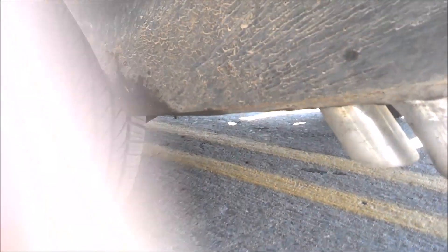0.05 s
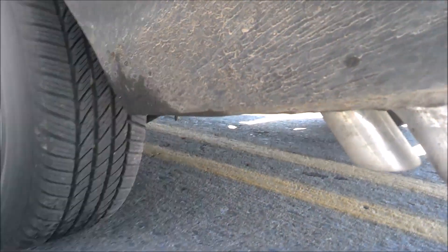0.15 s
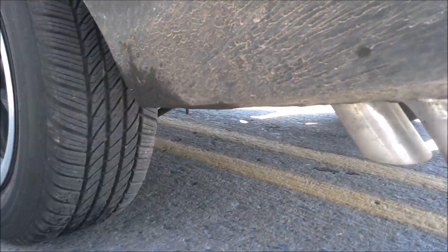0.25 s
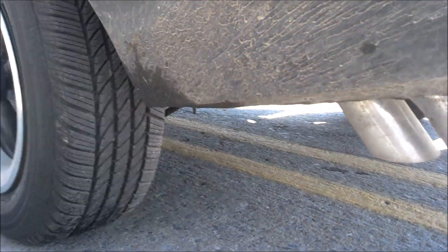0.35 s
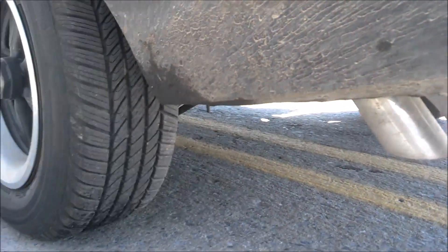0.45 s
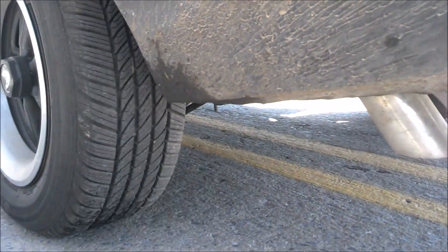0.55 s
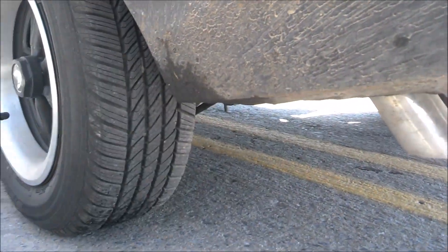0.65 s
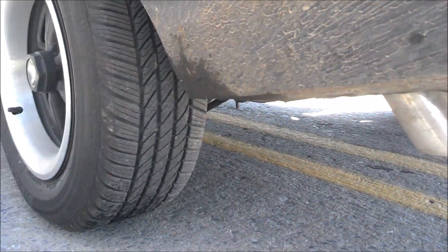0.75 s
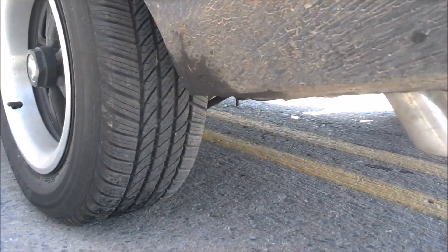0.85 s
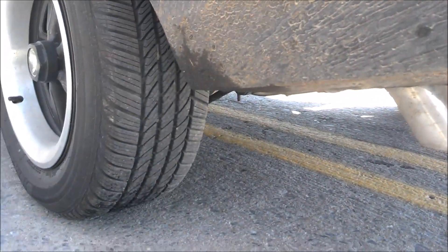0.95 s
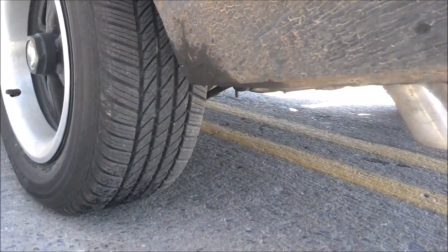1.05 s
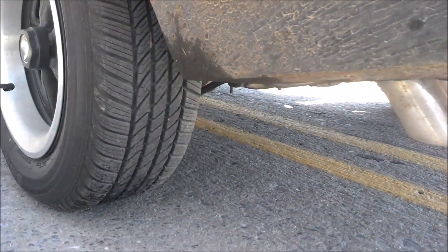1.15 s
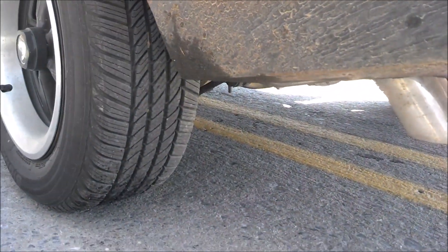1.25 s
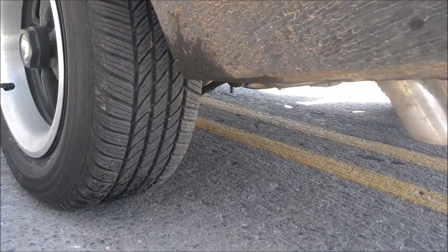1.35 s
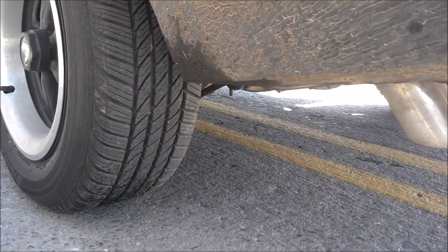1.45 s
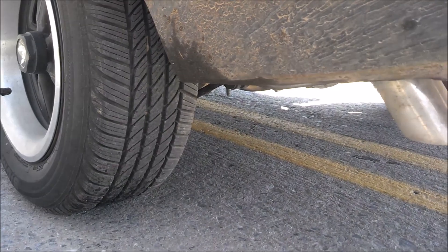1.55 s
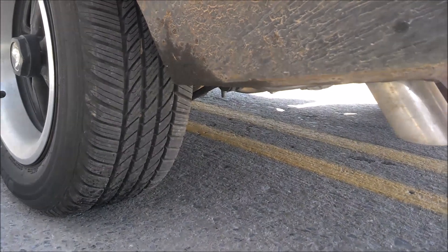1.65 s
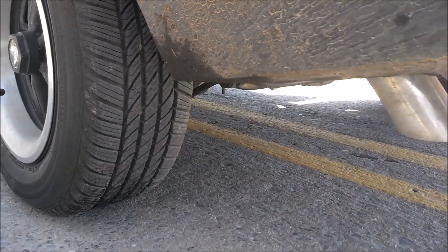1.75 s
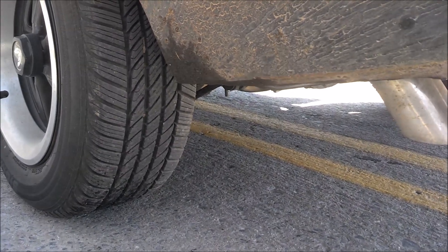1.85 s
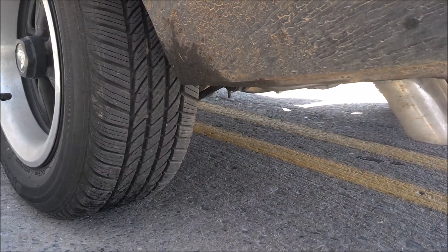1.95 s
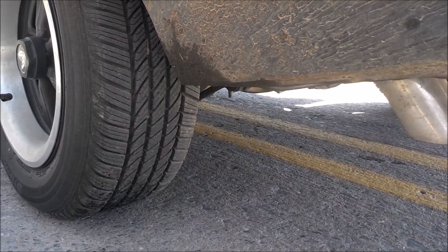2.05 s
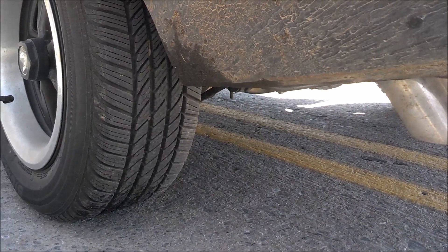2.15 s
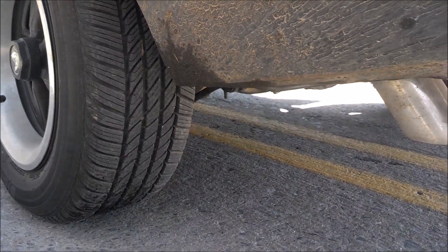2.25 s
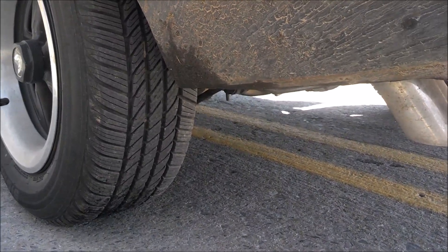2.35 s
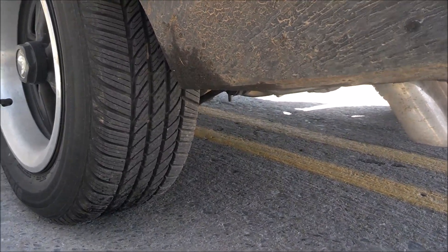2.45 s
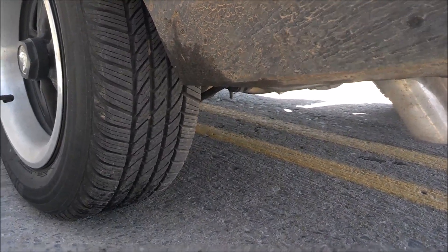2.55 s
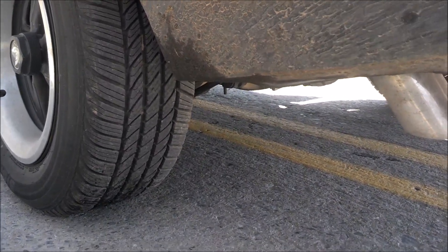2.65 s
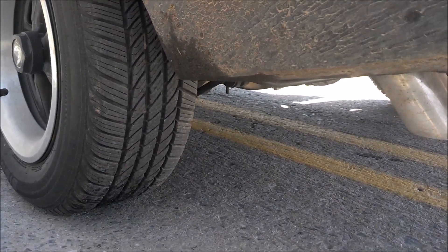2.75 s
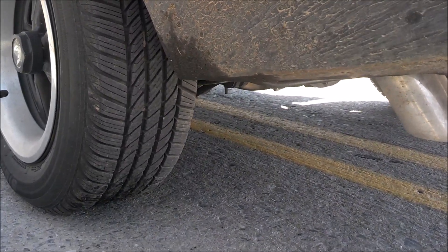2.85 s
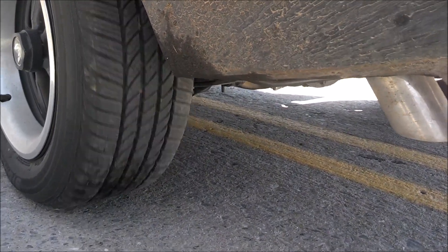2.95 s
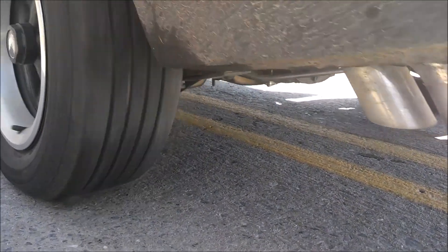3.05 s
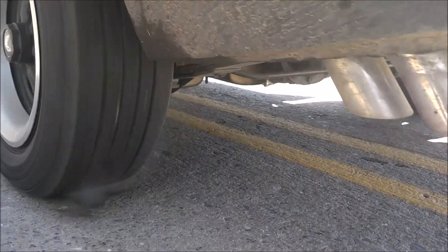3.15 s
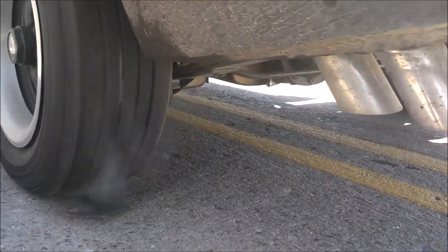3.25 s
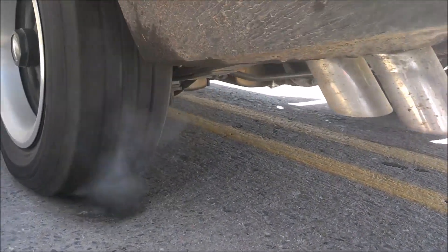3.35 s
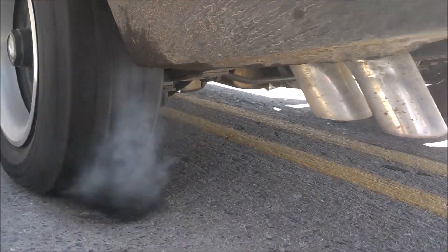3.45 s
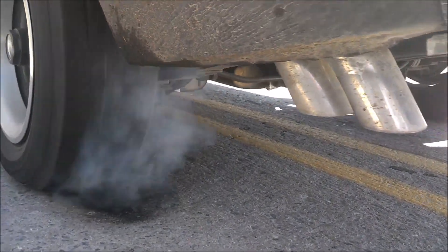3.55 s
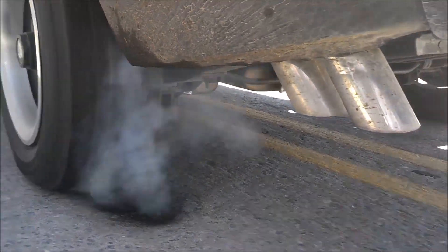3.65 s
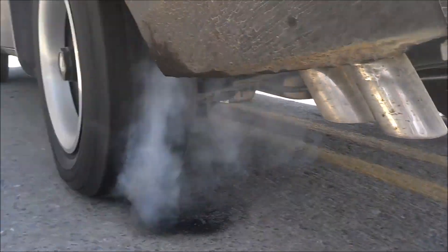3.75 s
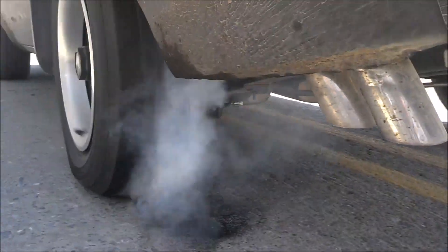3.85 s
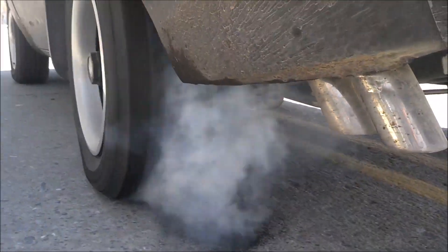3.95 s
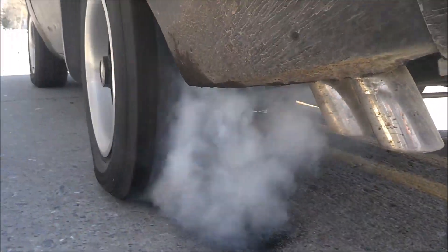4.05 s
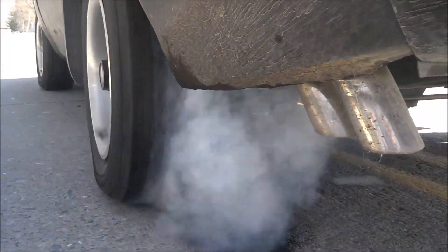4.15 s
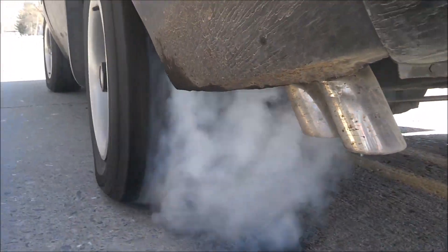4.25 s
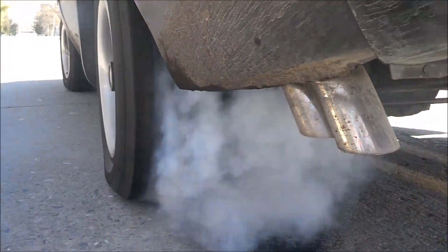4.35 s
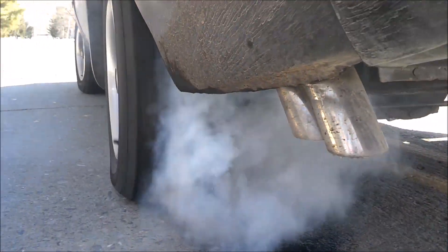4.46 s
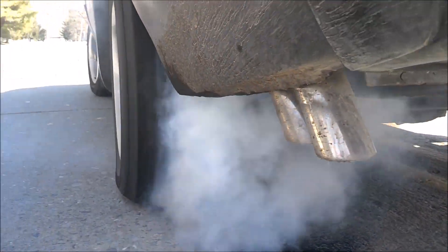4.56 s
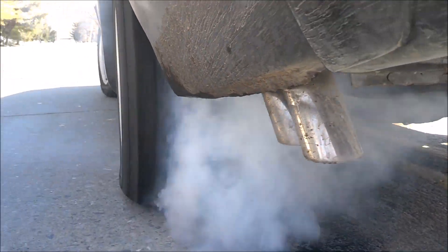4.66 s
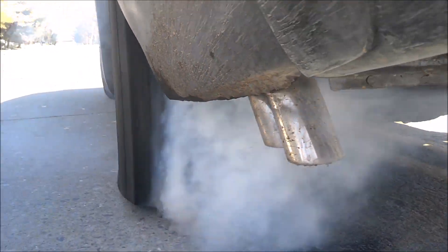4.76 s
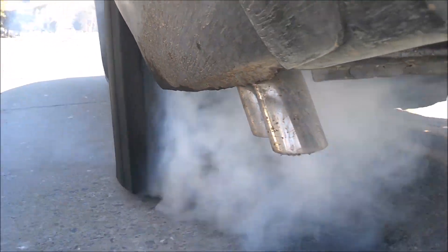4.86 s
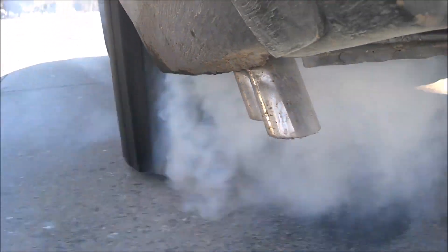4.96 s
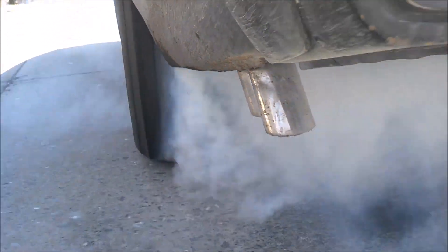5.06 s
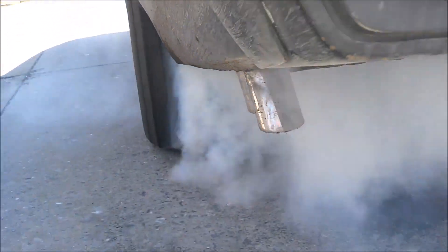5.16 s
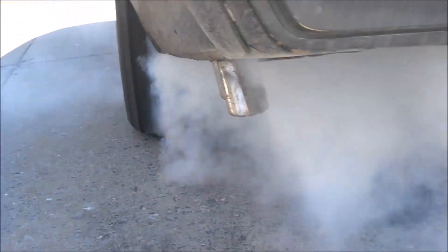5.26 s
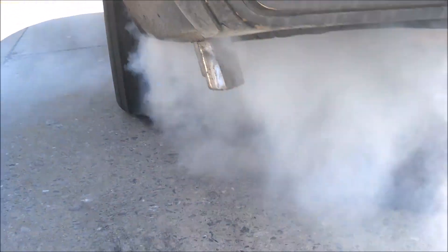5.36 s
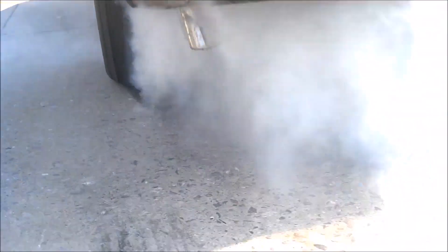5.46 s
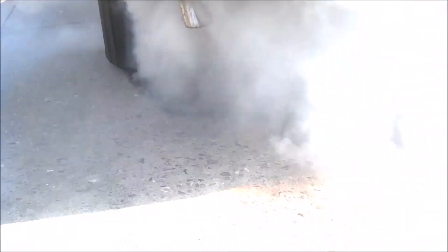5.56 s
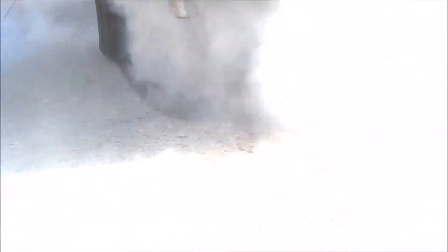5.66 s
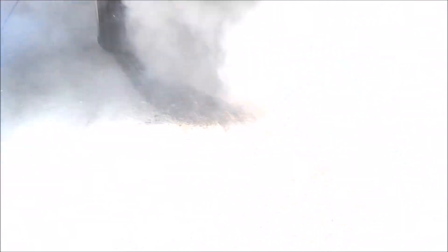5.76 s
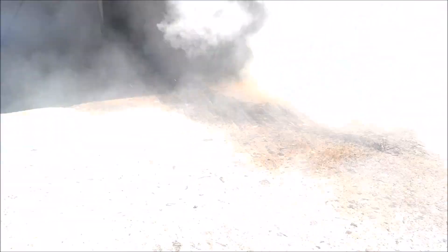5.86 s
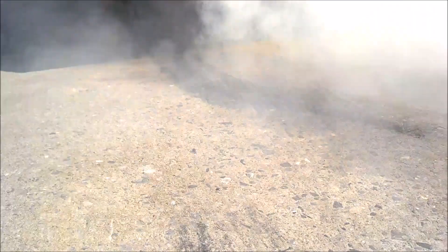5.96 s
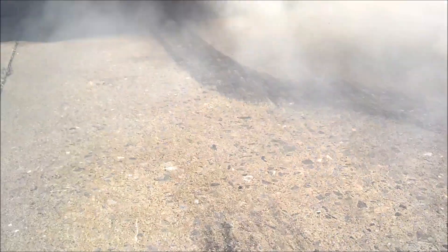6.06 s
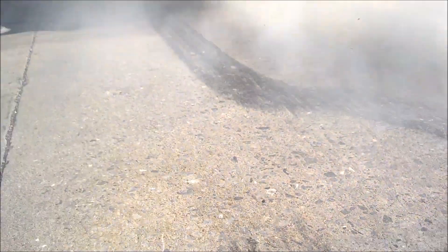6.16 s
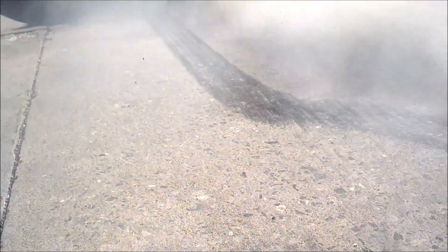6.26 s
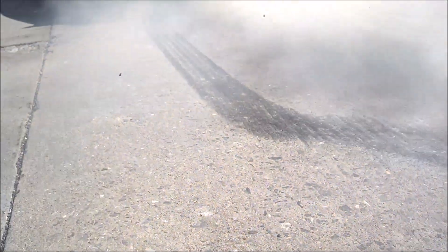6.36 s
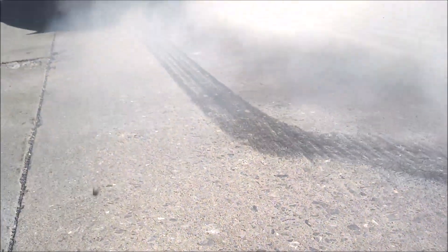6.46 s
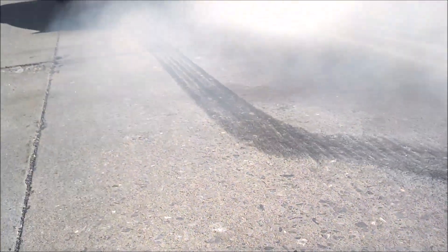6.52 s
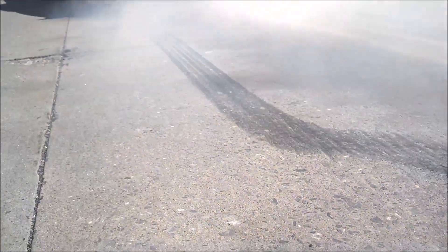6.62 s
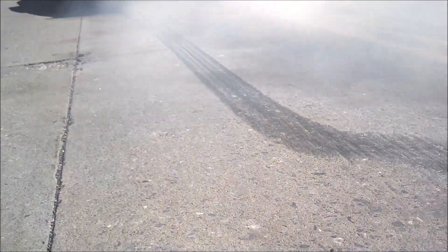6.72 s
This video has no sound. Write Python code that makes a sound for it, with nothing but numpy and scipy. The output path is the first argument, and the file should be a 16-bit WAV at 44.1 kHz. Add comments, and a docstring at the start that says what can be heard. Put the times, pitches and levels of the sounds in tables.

```python
"""A V8 car lopes at idle, then its throttle snaps open in hard single firings and the exhaust note sweeps upwards.
The tyre breaks loose: it squeals cleanly by stick-slip, then hot and ragged with chirps, over a droning exhaust.
The spinning wheel's air buffets two close microphones; at the end the car leaves to the left, heard from behind.
Tones on multiples of the engine cycle and gated noise make the engine; wavering harmonic tones make the tyre.
Delayed subtraction widens the stereo pair, and a limiter lets loud squeals duck the engine."""
import sys
import numpy as np
from scipy import signal
from scipy.fft import rfft, irfft
from scipy.io import wavfile
from scipy.ndimage import uniform_filter1d, minimum_filter1d

SR = 44100
rng = np.random.default_rng(int(sys.argv[2]) if len(sys.argv) > 2 else 0)


def dump(signal):
    """Clip the signal to [-1, 1] and save it as 16-bit WAV at the path in sys.argv[1]."""
    limited = np.clip(np.atleast_2d(signal).T, -1, 1)
    pcm = np.round(limited * 32767).astype(np.int16)
    wavfile.write(sys.argv[1], SR, pcm)


N = 299439
T = np.arange(N) / SR
HZ = np.fft.rfftfreq(N, 1 / SR)

THROTTLE_S = 2.816  # the throttle opens
BITE_S = 2.88  # the first hard firings take over from the idle
SLIP_S = 3.04  # the tyre breaks loose and the load drops
HOT_S = 3.92  # the hot tread stops slipping in step
BEHIND_S = 6.04  # from here the car is heard from behind, where boom and squeal are stronger


def amp(db):
    """Level law: decibels to amplitude gain."""
    return 10 ** (np.asarray(db) / 20)


def unit(x):
    """Power normalisation: scales to rms 1."""
    return x / np.sqrt(np.mean(abs(x) ** 2) + 1e-20)


def ramp(start, seconds):
    """Linear onset: goes from 0 to 1 in a straight line."""
    return np.clip((T - start) / seconds, 0, 1)


def build(start, seconds):
    """Exponential relaxation: grows from 0 towards 1, quickly at first."""
    return 1 - np.exp(-np.maximum(T - start, 0) / seconds)


def curve(rows, axis=1):
    """Linear interpolation: one column of a time table at every sample."""
    rows = np.array(rows)
    return np.interp(T, rows[:, 0], rows[:, axis])


def colour(x, points):
    """Linear filtering: shapes the spectrum by (Hz, dB) points, interpolated over log frequency."""
    hz, db = np.transpose(points)
    gain = amp(np.interp(np.log(HZ + 1), np.log(hz), db))
    return irfft(rfft(x) * gain, N)


def wander(rate):
    """Low-passed noise: a smooth random curve of rms 1 that changes about rate times a second."""
    f = np.fft.rfftfreq(8192, N / SR / 8192)
    slow = irfft(rfft(rng.standard_normal(8192)) / np.sqrt(1 + (f / rate) ** 4))
    return unit(np.interp(T, np.linspace(0, T[-1], len(slow)), slow))


# The car creeps forward, then drives off. Each row: time in seconds, distance in metres.
DISTANCE = [(0, 0.54), (4.6, 0.6), (6.27, 0.83), (6.79, 2.67)]


def away(falloff):
    """Spreading loss: gain as the car leaves; falloff 1 is the inverse of the distance."""
    return (DISTANCE[0][1] / curve(DISTANCE)) ** falloff


def ports(pair, left_db):
    """Sum-and-difference stereo: decodes to left and right, leaning to one side."""
    both, apart = pair
    return np.array([both + apart, both - apart]) * amp(left_db * np.array([[.5], [-.5]]))


# Wind rumble on the microphones. Each row: frequency in Hz, relative level in dB.
BUFFET_COLOUR = [(10, 30), (35, -10), (70, 8), (130, 23), (300, 5), (900, -42)]
# Soft thumps of air. Each row: centre in seconds, length between 1/e points in seconds, level in dB.
THUMPS = [(3.13, 0.08, -40), (3.577, .05, -47), (3.763, 0.06, -34), (5.11, 0.045, -55)]
# Spectrum of a thump. Each row: frequency in Hz, relative level in dB.
THUMP_COLOUR = [(10, 5), (35, -3), (60, -6), (120, -30), (400, -70)]
# air buffets the microphones while the spinning wheel is near
WIND_S, WIND_RISE_S, WIND_END_S, WIND_FALL_S = 3.2, 0.21, 5.6, 0.46


def buffet(common_db=-38, gust_db=4, wind_db=-23, easing_db_per_s=4.0, calm_db=-62):
    """Turbulent pressure: lumpy rumble pushes the microphones in opposite directions; a few thumps hit both."""
    rumble = unit(colour(rng.standard_normal((2, N)), BUFFET_COLOUR))
    wind = amp(wind_db - easing_db_per_s * (T - WIND_S))
    wind = wind * ramp(WIND_S, WIND_RISE_S) * (1 - ramp(WIND_END_S, WIND_FALL_S))
    # common_db weakens the sum against the difference
    gusts = unit(amp(gust_db * wander(8.8))) * (wind + amp(calm_db)) * amp([[common_db], [0]])
    swells = sum(amp(db) * np.exp(-(2 * (T - s) / length) ** 2) for s, length, db in THUMPS)
    return rumble * gusts + swells * unit(colour(rng.standard_normal((2, N)), THUMP_COLOUR))


PIPE_HZ = 94.6  # spacing of the standing waves in the exhaust pipe


def gas(envelope, spectrum, width, echo=0.):
    """Standing waves: gated noise rings in the pipe; returns the sum and difference of the microphones."""
    noise = rfft(rng.standard_normal((2, N)) * envelope)
    # the echo weakens towards the treble
    reflection = np.clip(echo, 0, .8) / (1 + (HZ / 2500) ** 2)
    pipe = 1 / (1 - reflection * np.exp(-2j * np.pi * HZ / PIPE_HZ))
    both, apart = colour(irfft(noise * pipe, N), spectrum)
    return np.array([both, colour(apart, width)]) / both.std()


# The eight firings of a cycle. Each entry: strength in dB.
CYLINDERS = [-2, -.5, 0, .5, 2, 1.5, 0, -1.5]


def firings(cycles, decay, base, scatter_db):
    """Periodic puffing: each firing lets out a puff; the cylinders differ in strength, which makes the lope."""
    count = (8 * cycles).astype(int)
    scatter = scatter_db * rng.standard_normal(4096)[count]
    strength = amp(np.array(CYLINDERS)[count % 8] + scatter)
    age = 8 * cycles % 1 / decay
    return uniform_filter1d(strength, size=100) * (base + age * np.exp(1 - age))


def drone(cycles, orders, levels, flutter, rate, spread, width, sweep=0.):
    """Beating of near-in-step engine orders: they throb once a cycle, each order sweep cycles later."""
    out = np.zeros((2, N))
    for order, level in zip(orders, levels):
        start, across = rng.standard_normal(2)
        late = sweep * (order - 16) ** 2 / 2
        angle = 2 * np.pi * (round(order) * cycles - late) + spread * start + flutter * wander(rate)
        size = np.sqrt(2) * level * (1 + flutter * wander(rate))
        out += size * np.array([np.cos(angle), np.cos(angle + np.pi / 2 + across / 4)])
    return np.array([out[0], colour(out[1], width)])


# Ringing of the engine's metal. Each row: frequency in Hz, relative level in dB, 60 dB decay time in seconds.
VALVE_MODES = [(2216, -3.5, 0.18), (3540, 4.5, 0.032), (4180, 9.5, 0.019), (5130, -15, .02),
               (6050, -15, .012), (7000, -14, 0.013)]


def valves(cycles, scatter_db=5, wash=0.084):
    """Modal ringing: valves tick unevenly in strength, twice a firing, and ring the engine's metal."""
    strength = amp(scatter_db * np.clip(rng.standard_normal((2, N)), -2, 2))
    ticks = np.diff((16 * cycles).astype(int), prepend=0) * strength
    drive = ticks + wash * rng.standard_normal((2, N))
    t = T[:SR // 10]
    ring = sum(amp(db) * np.exp(-np.log(1000) * t / t60) * np.sin(2 * np.pi * hz * t)
               for hz, db, t60 in VALVE_MODES)
    return unit(signal.oaconvolve(drive, ring[None], axes=1)[:, :N])


# Exhaust tones at idle. Each row: multiple of the four-stroke cycle rate, relative level in dB.
IDLE_ORDERS = [(8, -55.5), (16, -28.5), (17, -36), (19, -42), (29, -42), (30, -39.5), (31, -36.5),
               (32, -33), (46, -42.5)]
# Stereo width at idle. Each row: frequency in Hz, microphone difference relative to their sum in dB.
IDLE_WIDTH = [(50, 7), (120, -15), (230, -2.5), (400, -9.5), (700, -2.5), (1100, -11.5), (2000, -1.5),
              (5000, 2), (12000, 0)]
# Hard single firings as the throttle snaps open. Each row: start in seconds, level over the other puffs in dB.
BARKS = [(2.879, -5), (2.888, 2), (2.899, 5), (2.978, 6), (2.995, -10), (3.021, 4)]
# Spectrum of the puffs. Each row: frequency in Hz, relative level per Hz in dB.
PUFF_COLOUR = [(25, -87), (70, -83), (160, -57), (300, -66), (450, -56.5), (600, -65.5), (820, -68),
               (1000, -54), (1300, -57), (1600, -64), (1900, -74.5), (2220, -73.5), (2400, -70.5),
               (2800, -73.5), (5000, -89)]
# Rush of the fan and the air intake. Each row: frequency in Hz, relative level per Hz in dB.
RUSH_COLOUR = [(1200, -49), (2200, -0.5), (2800, -9), (3500, 3), (4300, -1.5), (5200, 8), (6200, 3.5),
               (7500, -3.5), (9500, -6.5), (15000, -27)]


def idle(cycles, lope=.72, lope_db=1.5, rasp_lead=0.41, tones_db=-1.5, puffs_db=-28.0, stab_db=7.0,
         rush_db=-36.5, gulp_db=13, valves_db=-42):
    """Amplitude modulation by the cycle: loping burble, rasp, valve clatter and fan rush; throttle lifts the gas."""
    orders, db = np.transpose(IDLE_ORDERS)
    # lope and rasp_lead are in cycles
    tones = drone(cycles - lope, orders, amp(db), flutter=0.16, rate=14.0, spread=1.0, width=IDLE_WIDTH)
    tones = tones * amp(tones_db) * (1 - ramp(BITE_S - .06, seconds=0.06))

    gate = firings(cycles, decay=0.25, base=1.0, scatter_db=1.3)
    # the rasp's lope turns over in phase as the throttle opens
    depth_db = lope_db * (0.5 - ramp(THROTTLE_S, seconds=0.24))
    surge = amp(depth_db * np.cos(2 * np.pi * (cycles - lope + rasp_lead)))
    barks = sum(amp(db) * (T >= s) * np.exp(-abs(T - s) / .005) for s, db in BARKS)
    puffs = gas(unit(gate * surge) + barks, PUFF_COLOUR, IDLE_WIDTH, echo=0.37)
    puffs = puffs * amp(puffs_db + stab_db * ramp(THROTTLE_S, seconds=0.092))
    puffs = puffs * (1 - ramp(SLIP_S, seconds=0.71))

    rush = gas((gate + .69) * amp(1.2 * wander(18)), RUSH_COLOUR, IDLE_WIDTH)
    rush = rush * amp(rush_db + gulp_db * ramp(THROTTLE_S - .06, seconds=0.2))
    rush = rush * (1 - build(SLIP_S - .06, seconds=0.19))
    clatter = valves(cycles) * amp(valves_db) * (1 - ramp(SLIP_S, seconds=.3))
    return tones + puffs + rush + clatter


# Exhaust resonances under the first hard firings. Each row: frequency in Hz, relative level per Hz in dB.
BLIP_COLOUR = [(40, -29), (80, -23), (118, -1), (165, -15), (205, -1), (240, 7), (285, -11), (340, 1),
               (390, -13), (465, 3), (560, -20), (800, -19), (2000, -42)]
# Exhaust tones as the throttle snaps open. Each row: multiple of the cycle rate, level in dB before the swell.
BLIP_ORDERS = [(8, -31), (9, -49), (16, -25), (17, -35), (24, -37), (30, -38), (31, -35), (32, -32.5)]


def blip(cycles, puffs_db=-30, tones_db=0, swell_db=9, apart_db=-6):
    """Rising periodicity: firing tones sweep up over sharp puffs of gas, swelling until the tyre lets go."""
    gate = firings(cycles, decay=0.069, base=0, scatter_db=1.0) * (abs(T - BITE_S) < .5)
    puffs = unit(colour(gate * rng.standard_normal((2, N)), BLIP_COLOUR))
    # dividing by the root of the duration sets the energy of the whole burst
    puffs = puffs / np.sqrt(T[-1]) * amp([[0], [apart_db]])
    orders, db = np.transpose(BLIP_ORDERS)
    tones = drone(cycles, orders, amp(db + tones_db), flutter=.15, rate=30, spread=1, width=IDLE_WIDTH)
    swell = amp(swell_db * (ramp(THROTTLE_S, SLIP_S - THROTTLE_S) - 1))
    fade = ramp(THROTTLE_S, seconds=.06) * (1 - ramp(SLIP_S, seconds=0.076))
    return (puffs * amp(puffs_db) + tones) * swell * fade


# Spectrum of the roar. Each row: frequency in Hz, relative level per Hz in dB.
ROAR_COLOUR = [(40, -61), (90, -33.5), (150, -16.5), (280, -17.5), (450, -9.5), (620, -10.5), (780, -9),
               (900, -8), (1100, 4.5), (1280, -1.5), (1500, -11), (1750, -13), (2200, -11.5), (2800, -24),
               (5000, -39)]
# Stereo width under load. Each row: frequency in Hz, microphone difference relative to their sum in dB.
LOAD_WIDTH = [(60, -2), (150, 0), (240, 4), (380, -6), (700, -3.5), (1100, -7), (2000, 0), (5000, 1),
              (12000, 1.5)]
# Beats of the roar once a cycle, band by band. Each row: centre in Hz, depth in dB, depth from behind in dB,
# boost from behind in dB, lag in cycles.
BEATS = [(400, 4.5, 6.5, -0.5, 0.15), (720, 2, 3.5, 3.5, 0.23), (1000, 0, 2, 0, 0.77),
         (1240, 2, 5.5, 1, 0.25), (1990, 1.3, -0.8, -1, 0.22)]


def roar(cycles, uneven=0.19, gust_db=1.6):
    """Modulated turbulence: gas beats once a cycle, no two alike; from behind, the pipes add a hard upper bark."""
    behind = ramp(BEHIND_S - .35, seconds=.35)
    gate = firings(cycles, decay=0.25, base=1, scatter_db=1.0)
    noise = rfft(gas(gate, ROAR_COLOUR, LOAD_WIDTH, echo=0.051))
    centres = [row[0] for row in BEATS]
    force = 1 + uneven * wander(18)
    out = np.zeros((2, N))
    # each band fades in and out between the centres of its neighbours
    for own, (hz, db, behind_db, boost_db, lag) in zip(np.eye(len(BEATS)), BEATS):
        depth = (db + (behind_db - db) * behind) * force
        beat = unit(amp(depth * np.cos(2 * np.pi * (cycles - lag)) + gust_db * wander(60)))
        band = irfft(noise * np.interp(HZ, centres, own), N)
        out += band * beat * amp(boost_db * behind)
    return out


# Exhaust tones under load. Each row: multiple of the cycle rate (rounded when played), then relative level
# in dB at low revs, in dB at middle revs and in dB at high revs.
LOAD_ORDERS = [(4.02, -80, -44, -53), (4.97, -62, -40, -51.5), (5.9, -61, -39.5, -46),
               (6.87, -40.5, -42, -44.5), (7.9, -36, -39, -35), (9, -52, -35.5, -43.5),
               (10, -48.5, -33, -43.5), (11, -45, -64, -66), (11.9, -34.5, -46, -57), (13, -59, -72, -52),
               (14.33, -44, -25, -31), (15.41, -36.5, -21.5, -28), (16, -23, -24.5, -23.5),
               (17, -70, -39, -34.5), (17.8, -50, -45, -33), (18.9, -44, -33, -35), (20, -53, -48, -45),
               (20.4, -41, -51, -31), (22.2, -52, -31, -32.5), (22.8, -29, -46, -25.5),
               (23.95, -41, -30.5, -35.5)]
# Engine speeds for those three levels. Each entry: firings a second.
REV_STAGES = [165, 227, 232.5]


def exhaust_tones(cycles, speed, slack_db=-12, revs_db=16, low_hz=152, high_hz=187, boom_db=0, spin_db=7,
                  behind_db=11, recover_s=0.15, ring_hz=462, ring_width_hz=30, ring_db=10, sweep=.022):
    """Pipe resonance: tones return as a boom after the slip, ring as they climb, then grow with the revs."""
    loose = ramp(SLIP_S, recover_s) ** 2
    revs = np.clip((speed - low_hz) / (high_hz - low_hz), 0, 1)
    upper = loose * amp(slack_db + revs_db * revs) * away(falloff=1.27)
    boom = amp(boom_db + spin_db * (1 - revs) + behind_db * ramp(BEHIND_S, seconds=0.43))
    boom = loose * boom * away(falloff=1.0)
    rows = np.array(LOAD_ORDERS)
    levels = []
    for row in rows:
        detune = (row[0] * speed / 8 - ring_hz) / ring_width_hz
        ring = ring_db * (1 - revs) / (1 + detune ** 2)
        level = amp(np.interp(speed, REV_STAGES, row[1:]) + ring)
        levels.append(level * (boom if row[0] < 10 else upper))
    return drone(cycles, rows[:, 0], levels, flutter=.1, rate=9, spread=.25, width=LOAD_WIDTH, sweep=sweep)


# Hiss of gas and scrubbed rubber. Each row: frequency in Hz, relative level per Hz in dB.
HISS_COLOUR = [(1200, -24), (2400, 4), (3200, 8), (4300, 5.5), (5500, 4.5), (7000, 1), (10000, -9),
               (15000, -48)]


def full_throttle(cycles, speed, throb_lag=0.1284, early_lag=0.103, roar_db=-10, hiss_db=-23.5):
    """Superposition: throbbing exhaust tones, the roar, and the hiss of gas and scrubbed rubber."""
    # lags in cycles; the throb comes later while the revs are low
    lag = throb_lag + early_lag * np.clip((REV_STAGES[1] - speed) / 35, 0, 1)
    rush = roar(cycles) * amp(roar_db) * build(SLIP_S - .04, seconds=0.3) * away(falloff=1.16)
    hiss = gas(amp(.5 * wander(60)), HISS_COLOUR, LOAD_WIDTH)
    hiss = hiss * amp(hiss_db) * build(SLIP_S - .04, seconds=0.47) * away(falloff=1.23)
    return exhaust_tones(cycles - lag, speed) + rush + hiss


# Overtones of the squeal. Each row: harmonic number, relative level in dB.
SQUEAL_TONES = [(2, -11.5), (3, -16), (4, -21)]


def stick_slip(angle, bright, top_db=0., smear=0.18, top_limit=0.84):
    """Stick-slip vibration: a strong fundamental, an octave set by bright, and faint, rough overtones above."""
    slip = smear * wander(92)[:len(angle)]
    top = np.minimum(bright, top_limit) * amp(top_db)
    wave = np.cos(angle)
    for k, db in SQUEAL_TONES:
        size = amp(db) * (top if k > 2.5 else bright)
        wave = wave + size * np.cos(round(k) * angle + (k - 1) ** 2 * slip)
    return np.sqrt(2) * wave


# The first, clean squeal. Each row: time in seconds, pitch in Hz before jitter, level in dB before skips
# and wobble, overtone strength in dB before flicker.
SQUEAL = [(3.04, 1023, -8.5, -9), (3.075, 955.4, -6, -10.5), (3.135, 1002, 1, -12.5),
          (3.165, 1028, -10.5, 5.5), (3.235, 1025, -12.5, 8), (3.3, 1065, -18.5, 6), (3.34, 1055, -1, -10),
          (3.44, 1036, -7.5, -7.5), (3.52, 1082, -3.5, -4.5), (3.63, 1065, -8.5, -2),
          (3.8, 1056, -3, -10.5), (3.86, 1102, -0.5, -6.5)]
# The clean squeal skips. Each row: centre in seconds, length between 1/e points in seconds, depth in dB.
SKIPS = [(3.102, 0.019, 14.5), (3.17, 0.013, 7.5), (3.27, 0.011, 9.5), (3.362, 0.0176, 16.5),
         (3.4, 0.012, 12), (3.437, 0.014, 11), (3.495, 0.013, 8.5), (3.566, 0.0099, 14.5),
         (3.671, 0.011, 17)]


def clean_squeal(turn, jitter=.009, wobble_db=1.3, fuzz_db=-13, lift_per_db=.002):
    """Stick-slip in step: the cool tread sings one wavering, fuzzy note, which flicks upwards at each skip."""
    skip_db = sum(db * np.exp(-(2 * (T - s) / length) ** 2) for s, length, db in SKIPS)
    hz = curve(SQUEAL) * (1 + jitter * wander(35.0) + lift_per_db * skip_db)
    angle = 2 * np.pi * np.cumsum(hz) / SR
    bright = amp(curve(SQUEAL, axis=3) + 3.5 * wander(29))
    level = amp(curve(SQUEAL, axis=2) - skip_db)
    level = level * ramp(SLIP_S, seconds=0.013) * (1 - ramp(HOT_S - .09, seconds=0.056))
    wobble = amp(wobble_db * wander(26))
    fuzz = (wander(55) + 1j * wander(62)) * np.exp(1j * angle) * amp(fuzz_db)
    return level * np.array([wobble * stick_slip(angle + a, bright) + (fuzz * np.exp(1j * a)).real
                             for a in (0, turn)])


RAGGED_HZ = 1066  # centre of the squeal once the tread is hot


def ragged_squeal(turn, jitter=0.01405, fuzz_hz=48, flutter_db=3.5, level_db=-18.5, fresh_db=5, settle_s=1.0,
                  behind_db=5.5):
    """Incoherent stick-slip: hot tread blocks make a fluttering band, boosted as it breaks up and from behind."""
    angle = 2 * np.pi * np.cumsum(RAGGED_HZ * (1 + jitter * wander(45.3))) / SR
    fuzz = (wander(fuzz_hz) + 1j * wander(fuzz_hz)) * np.exp(1j * angle)
    fuzz = fuzz * unit(amp(flutter_db * wander(25)))
    db = level_db + fresh_db * (1 - ramp(HOT_S, settle_s)) + behind_db * ramp(BEHIND_S, seconds=0.14)
    level = amp(db) * ramp(HOT_S - .09, seconds=0.089) * away(falloff=0.53)
    return level * np.array([(fuzz * np.exp(1j * a)).real for a in (0, turn)])


def squeaks(per_s=40, low_hz=950, high_hz=1400, length_s=.016, glide=.06, level_db=-14.5):
    """Random stick-slip: single tread blocks catch at random, each with a short gliding squeak."""
    out = np.zeros((2, N))
    count = round(per_s * (T[-1] - HOT_S))
    for k, (late, pitch, size, bend, turn) in enumerate(rng.random((count, 5))):
        t = T[:int(length_s * (1 + size) * SR)]
        drift = 1 + glide * (2 * bend - 1) * (2 * t / t[-1] - 1)
        hz = low_hz * (high_hz / low_hz) ** pitch * drift
        angle = 2 * np.pi * np.cumsum(hz) / SR
        squeak = (.5 + size) * np.hanning(len(t)) * np.cos([angle, angle + 2 * turn])
        part = out[:, int((HOT_S + (k + late) / per_s) * SR):][:, :len(t)]
        part += squeak[:, :part.shape[1]]
    return out * away(falloff=0.74) * amp(level_db)


# The tread catches and rings cleanly. Each row: centre in seconds, length in seconds, mid-chirp pitch in Hz
# before wavering, relative level in dB, overtone strength in dB.
CHIRPS = [(3.92, 0.038, 1066, -4.5, -7), (4.077, .038, 1072, -7, -22), (4.185, 0.045, 1049, -5.5, -21),
          (4.24, 0.052, 1043, 2.5, -15), (4.283, 0.024, 1100, -7.5, -18), (4.399, 0.067, 1060, 1, -15),
          (4.446, 0.025, 1027, -9, -15), (4.532, 0.025, 1023, -9, -18), (4.611, 0.049, 1077, -7, -19),
          (4.744, 0.022, 1063, -9, -14), (4.847, 0.019, 1052, -3, -20), (4.897, 0.014, 1110, -5, -6),
          (4.943, 0.037, 1075, 0, -17), (5.078, 0.031, 1032, -12.5, 1), (5.233, 0.043, 1071, -4.5, -5),
          (5.346, 0.037, 1060, -8.5, -5), (5.526, 0.045, 1100, -10.5, 5), (5.584, .04, 1036, -11, 3),
          (5.656, 0.036, 1046, -9, -12), (5.695, .04, 1061, -9.5, -4), (6.012, 0.024, 1027, -10, -21),
          (6.19, 0.021, 1108, -13, 1), (6.227, 0.038, 1037, -4, 0), (6.416, 0.021, 1082, -11, -2),
          (6.439, 0.038, 1065, -10, -0.5), (6.462, .022, 1115, -10.5, 5), (6.568, 0.012, 1082, -8, -8),
          (6.638, .012, 1090, -15, -10), (6.656, 0.013, 1066, -15.5, -9), (6.708, .02, 1093, -17.5, -10),
          (6.752, 0.018, 1075, -8, -9.5)]


def tyre(chirp_db=0.5, turn=0.98, scoop=0.047, top_db=-5):
    """Stick-slip: a clean squeal turns ragged; the whole tread catches and chirps, lowest in pitch mid-chirp."""
    # turn: phase in radians between sum and difference
    out = clean_squeal(turn) + ragged_squeal(turn) + squeaks()
    waver = 1 + 0.014 * wander(67)
    for s, length, hz, db, overtone_db in CHIRPS:
        span = abs(T - s) < length / 2
        bend = 1 + scoop * (2 * (T[span] - s) / length) ** 2
        angle = 2 * np.pi * np.cumsum(hz * bend * waver[span]) / SR
        swell = signal.windows.tukey(span.sum(), .6)
        chirp = np.array([stick_slip(angle + a, amp(overtone_db), top_db) for a in (0, turn)])
        # while the whole tread rings together, the ragged squeal gives way
        out[:, span] *= 1 - swell
        out[:, span] += amp(db + chirp_db) * swell * chirp
    return np.array([out[0], colour(out[1], LOAD_WIDTH)])


# Engine speed. Each row: time in seconds, firings a second.
SPEED = [(0, 59.09), (2.825, 58.15), (2.89, 82), (2.95, 105), (3.02, 121.2), (3.2, 139.1), (3.4, 155.3),
         (3.6, 168.2), (3.85, 179.5), (4.2, 186.1), (4.55, 191.3), (4.85, 202.3), (5.15, 217.3),
         (5.45, 228.4), (5.85, 239), (6.25, 243.2), (6.5, 238.5), (6.79, 230.3)]


def scene(hunt=0.0048, veer_db=5.5):
    """Superposition of engine, tyre and wind; the idle hunts a little in phase, and the car leaves to the left."""
    speed = curve(SPEED)
    cycles = np.cumsum(speed / 8) / SR  # eight firings a cycle
    cycles = cycles + hunt * wander(1.14) * (1 - ramp(THROTTLE_S, seconds=0.19))
    veer = veer_db * ramp(BEHIND_S, seconds=0.43)
    early = ports(idle(cycles) + blip(cycles), left_db=-1.0)
    loaded = ports(full_throttle(cycles, speed), left_db=-0.1 + veer)
    return early + loaded + ports(tyre() + buffet(), left_db=veer)


def limit(x, ceiling):
    """Peak limiting: the gain falls just enough to keep both channels under the ceiling."""
    gain = minimum_filter1d(ceiling / np.maximum(abs(x).max(0), ceiling), size=200)
    return x * uniform_filter1d(gain, size=200)


PORT_DELAY = 16 / SR  # seconds, delay of the subtraction between microphones
EDGE_HZ = 15500  # upper edge of the output band


def record(dry, ceiling=0.85, split_hz=1700):
    """Comb filtering widens the stereo; a fast limiter on the lower band lets loud squeals duck the engine."""
    angle = np.pi * HZ * PORT_DELAY
    # the bass of the sum is restored below the first crest of the comb
    both = rfft(dry[0] + dry[1]) / 2 * np.where(angle < np.pi / 2, 1, np.sin(angle))
    apart = rfft(dry[0] - dry[1]) / 2 * np.cos(angle)
    wide = np.array([both + apart, both - apart])
    share = 1 / (1 + (HZ / split_hz) ** 12)
    low, high = irfft(wide * share, N), irfft(wide * (1 - share), N)
    limited = limit(limit(low, ceiling) + high, 0.89)
    lowpass = signal.firwin(511, EDGE_HZ, window=("kaiser", 9), fs=SR)
    return signal.oaconvolve(limited, lowpass[None], "same")


dry = scene()
out = record(dry)
dump(out)
```